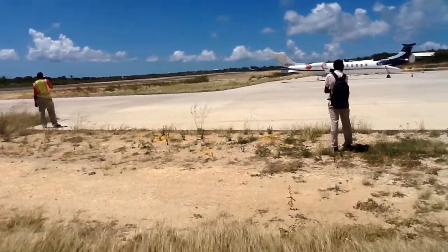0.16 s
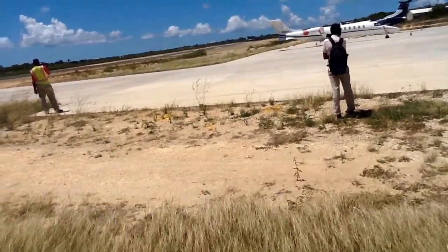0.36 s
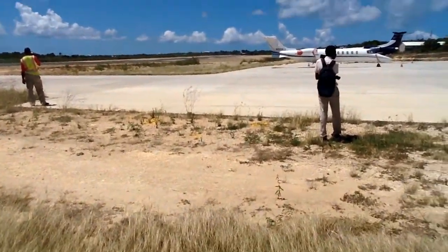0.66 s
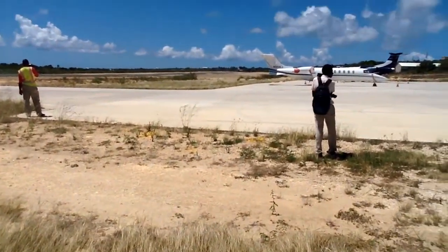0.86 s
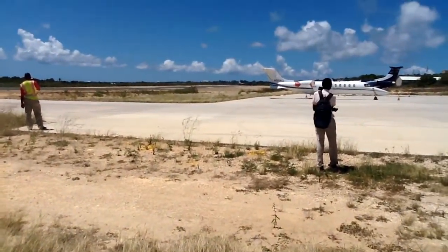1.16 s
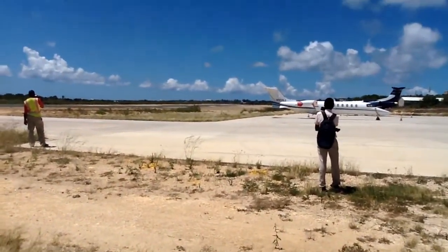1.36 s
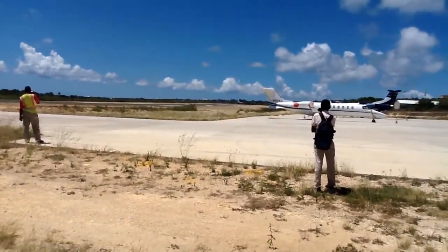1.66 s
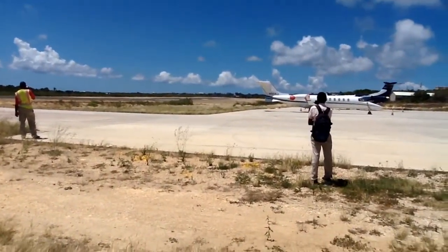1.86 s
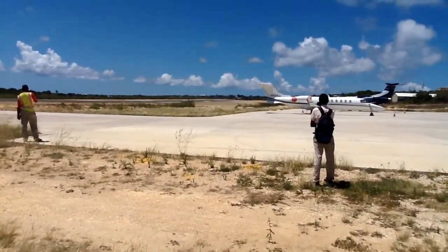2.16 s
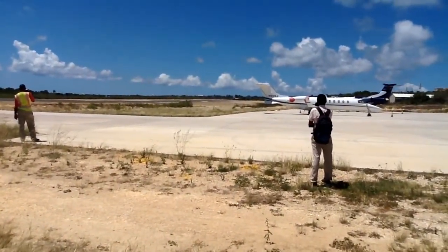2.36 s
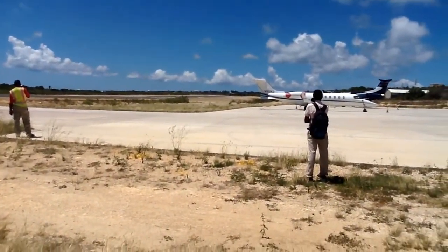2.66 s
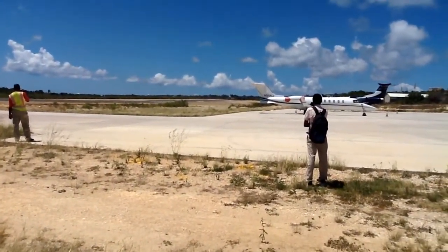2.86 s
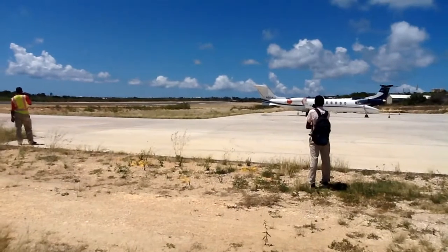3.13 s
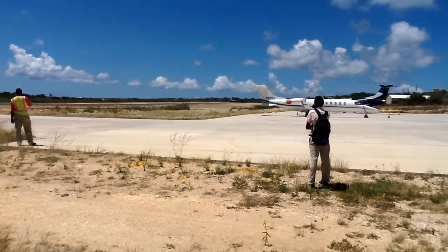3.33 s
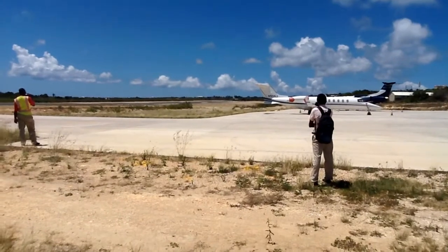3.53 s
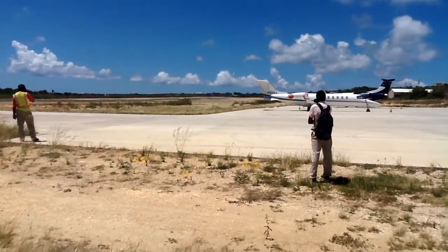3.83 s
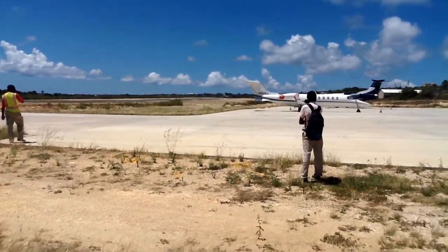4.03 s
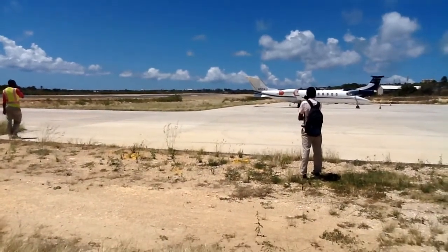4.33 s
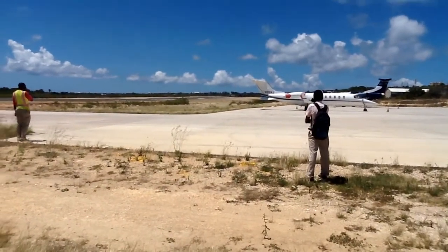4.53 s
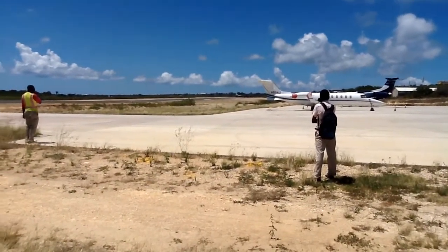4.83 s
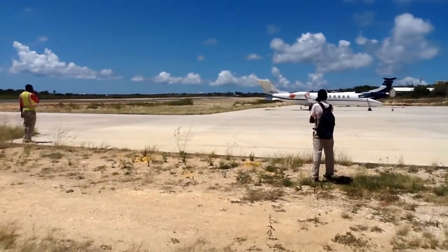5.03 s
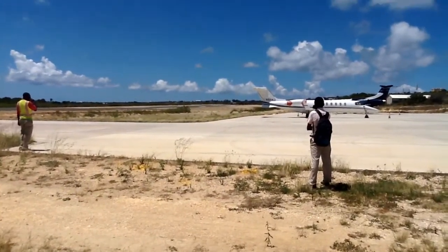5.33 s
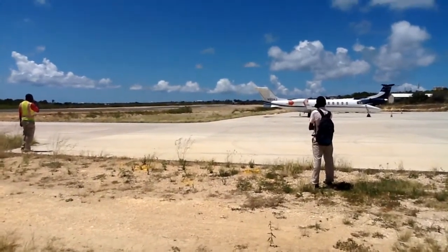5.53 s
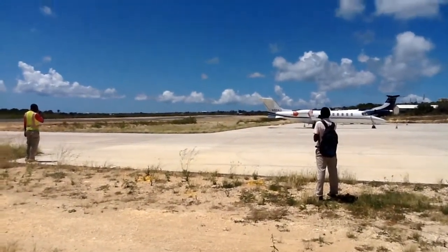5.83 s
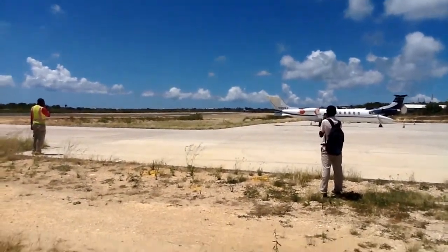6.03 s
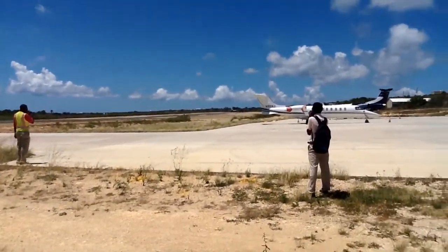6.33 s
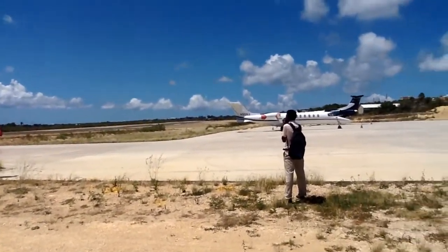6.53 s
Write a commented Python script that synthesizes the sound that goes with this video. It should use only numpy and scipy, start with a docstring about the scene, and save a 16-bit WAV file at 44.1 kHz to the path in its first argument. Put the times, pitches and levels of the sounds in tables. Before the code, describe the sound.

Close wind noise on a handheld camera at an open airfield, about 6.7 seconds. A wavering, hollow, nearly pure whistle begins at once over low rumble and airy hiss, dips in the first second with a soft finger brush near 0.6, then jumps higher and louder around 1.1. Puffs splutter near 1 second, and dull case knocks with sharp clicks land around 0.8, 1.0, 1.5 and 2.3. The whistle whoops and sags through 3.3, with another knock there, then sinks low and weak from 3.6 to 4.5. A deep lumpy squall presses around 4.2, with paired knocks. From 4.6 the whistle surges back, chirping quickly, with knocks near 5.2, 5.4, 6.1 and 6.25. It drops briefly, fingers brush faintly around 6.3 to 6.4, and it rises again at the end. Throughout, a distant small jet makes a quiet steady rush with a barely audible thin whine.

```python
"""Windy airfield with a far-off jet

Gusty wind whistles across a camera's microphone opening, higher and louder as it speeds up, and rumbles on it.
The whistle is a wavering sine with overtones; the rumble, puffs and a deep squall are shaped noise.
A small jet far off is a steady rush of noise with a faint whine.
The hand-held camera's case knocks (short rings) and clicks (pulses), and fingers brush it (tiny grains)."""
import sys
import numpy as np
from scipy import signal
from scipy.fft import rfft, irfft, next_fast_len
from scipy.io import wavfile
from scipy.ndimage import map_coordinates

SR = 44100
rng = np.random.default_rng(int(sys.argv[2]) if len(sys.argv) > 2 else 0)


def waveform_to_disk(signal):
    """Save audio, clipped to [-1, 1], as 16-bit WAV at the path in sys.argv[1]."""
    frames = np.transpose(np.atleast_2d(signal))
    scaled = np.clip(frames, -1, 1) * 32767
    samples = np.round(scaled).astype(np.int16)
    wavfile.write(sys.argv[1], SR, samples)


N = 294906  # length in samples

# All the *_COLOUR tables are spectra; only the shape counts where the sound is later scaled to a set level.
# the jet's exhaust rush: f/Hz, level/dB per Hz
JET_COLOUR = [(60, -33), (200, -4), (500, 1.5), (850, -9), (1050, 3.5), (1500, -5.5), (1850, -3.5),
              (2050, -10), (2600, -12.5), (3100, -14), (3900, -21), (4700, -26), (5500, -34), (9000, -45.5)]
# blade tones of the two engines: f/Hz, middle level/dB
ENGINE_WHINES = [(3560, -78), (3740, -78)]

# fingers sliding on the case: t/s, half length/s, level/dB
FINGER_BRUSHES = [(0.576, 0.11, -62.5), (6.281, .035, -62), (6.4, .13, -63)]
# sound of skin on the case: f/Hz, level/dB per Hz
BRUSH_COLOUR = [(1500, -26.5), (3500, 6.5), (5000, 2.5), (7500, -2.5), (12000, -5.5), (15000, -3.5)]
# sharp clicks of the case, before the level trims in clicks(): t/s, snap level/dB, bright tick level/dB
CASE_CLICKS = [(0.3208, -25.5, -63), (0.6685, -50, -50), (0.8277, -21, -68), (1.04, -15, -52.5),
               (1.4595, -23.5, -62), (1.5467, -54, -43), (1.5589, -52, -41.5), (1.7654, -12.5, -58.5),
               (2.1833, -34.5, -46.5), (2.2009, -15, -56), (2.265, -7.5, -62.5), (2.2732, -29, -44.5),
               (3.1357, -21.5, -78), (3.264, -19, -60), (3.6183, -18.5, -71.5), (4.1974, -24, -83.5),
               (4.233, -26.5, -85), (5.5092, -21.5, -59), (6.246, -25.5, -60), (6.413, -28, -73.5)]
# the snap of a click: f/Hz, level/dB
CLICK_COLOUR = [(200, -10), (900, 4), (2200, -1), (3500, -5.5), (5000, -17.5), (6500, -30.5), (9000, -30),
                (15000, -56.5)]
# the bright tick of a click: f/Hz, level/dB
TICK_COLOUR = [(1000, -31.5), (4000, -5), (7000, 0.5), (10000, 3), (15000, -0.5)]
# dull knocks on the case: t/s, peak level of the ring/dB, f/Hz the ring settles at
CASE_KNOCKS = [(0.823, -18.5, 225.3), (1.036, -8, 318), (1.459, -6, 338), (2.265, -17.5, 403),
               (2.285, -17, 313), (3.263, -10.5, 324), (4.178, -9.5, 306), (4.199, -13.5, 452),
               (5.218, -13, 262), (5.362, -21.5, 380), (6.106, -13.5, 268), (6.246, -13.5, 316)]
# the thud within a knock: f/Hz, level/dB
THUD_COLOUR = [(60, -10.5), (200, -6), (450, 1), (1000, 4.5), (1600, -12.5), (2400, -14), (4500, -40.5),
               (7000, -64)]

# deep rumble of the squall: f/Hz, level/dB per Hz
SQUALL_COLOUR = [(40, -42), (100, -12), (170, 2), (260, 1), (380, -8), (700, -26), (3000, -80)]
# puffs that hit the diaphragm head-on: t/s, level/dB, half length/s, bass relative to that level/dB
HEAD_ON_PUFFS = [(0.022, -30, 0.017, -19), (0.942, -26, 0.016, -5), (1, -27, 0.017, -5.5),
                 (1.085, -30.5, .03, -4.5), (1.169, -27, .015, -7.5), (1.731, -30.5, 0.0448, -14),
                 (2.588, -32.5, .012, -14), (3.019, -30.5, 0.03704, -10), (3.859, -35, 0.044, -11),
                 (3.983, -33, 0.018, -7), (4.077, -27, .027, -9), (4.191, -21, .014, -11),
                 (4.244, -26.5, 0.023, -9.5), (4.63, -28, .025, -15.5), (6.12, -26.5, .013, -10.5)]
# the splutter of a puff: f/Hz, level/dB per Hz
PUFF_COLOUR = [(30, -41), (80, -25), (150, 7.5), (280, 4), (500, 1.5), (850, -7.5), (1400, -18),
               (2500, -34), (4500, -45.5), (7000, -68.5), (15000, -85)]
# the bass push of a puff: f/Hz, level/dB per Hz
PUFF_BASS_COLOUR = [(25, -14.5), (50, -15), (85, -0.5), (130, 5), (250, -10.5), (600, -57)]
# wind rumble on the diaphragm: f/Hz, level/dB per Hz
BUFFET_COLOUR = [(20, -47), (40, -36), (70, -15), (110, -11.5), (170, 0), (260, -1), (400, -7.5),
                 (700, -9.5), (1200, -32), (3000, -70)]
# hiss of small eddies at the rim: f/Hz, level/dB per Hz
EDDY_COLOUR = [(200, -22.5), (500, 8.5), (800, 6.5), (1200, -4), (1600, -7.5), (2000, -17), (2800, -23),
               (4000, -34), (6000, -49), (15000, -62)]

# wind speed between gusts, given as the pitch it whistles at: t/s, f/Hz
BREEZE_SPEED = [(0.0, 397.0), (0.05, 456.0), (0.2, 469.0), (0.33, 373.0), (0.88, 385.0), (1.12, 630.0),
                (1.45, 464.0), (1.62, 458.0), (1.92, 554.0), (2.22, 670.0), (2.33, 531.0), (2.7, 555.0),
                (3.3, 472.0), (3.6, 400.0), (4.5, 347.0), (4.66, 596.0), (5.14, 631.0), (5.44, 510.0),
                (5.75, 615.0), (6.1, 617.0), (6.25, 396.0), (6.48, 480.0), (6.56, 590), (6.69, 610)]
# gusts, each one upward whoop or chirp: peak t/s, length/s, rise in f/Hz
GUSTS = [(0.4, 0.03, 55), (0.611, 0.12, 117), (0.71, 0.035, 70), (1.031, 0.045, 197), (1.157, 0.037, 173),
         (1.269, 0.057, 50), (1.516, 0.052, 118), (1.696, 0.072, 126), (1.772, 0.047, 142),
         (1.836, 0.052, 141), (2.009, 0.019, 52), (2.243, 0.033, 50), (2.388, 0.079, 59),
         (2.594, 0.033, 121), (2.993, 0.07, 101), (3.073, 0.03, 111), (3.133, 0.029, 70),
         (3.322, 0.12, 136), (4.554, 0.02, 80), (4.619, 0.062, 204), (4.791, 0.041, 154),
         (5.089, 0.061, 99), (5.136, 0.044, 77), (5.212, 0.018, 131), (5.251, 0.025, 126),
         (5.332, 0.019, 97), (5.436, 0.034, 82), (5.61, 0.098, 91), (5.687, 0.018, 87), (5.736, 0.038, 102),
         (5.858, 0.12, 111), (5.981, 0.026, 132), (6.158, 0.072, 88), (6.345, 0.047, 224),
         (6.552, 0.04, 110)]
# lulls, in which the whistle sags: deepest t/s, length/s, drop in f/Hz
LULLS = [(1.783, 0.044, 166), (2.103, 0.047, 181), (2.486, 0.039, 75), (2.862, 0.1, 106),
         (3.177, 0.025, 123), (4.852, 0.037, 156), (4.959, 0.034, 74), (5.405, 0.064, 104),
         (5.468, 0.065, 78), (5.891, 0.07, 164)]
# how well the veering wind hits the edge of the opening: t/s, effect on the tone level/dB
WIND_AIM = [(0.0, -6), (0.16, -1.5), (0.4, -6.5), (0.65, -10), (0.88, -8.5), (1.15, -16.1), (1.2, -2.5),
            (1.7, -5.5), (1.9, -4), (2.5, -5), (3.1, -9), (3.38, -3.5), (3.7, -16.5), (4.45, -15.5),
            (4.6, -5.5), (5.13, -5), (5.5, -8.5), (6.05, -5), (6.3, -12), (6.69, -5.2)]
# overtones of the whistle at the usual speed: multiple of its pitch, level relative to the tone/dB
WHISTLE_OVERTONES = [(2, -24), (3, -32), (4, -43)]
# steady hiss of the camera: f/Hz, level/dB per Hz
CAMERA_HISS_COLOUR = [(100, -4.5), (5000, -4), (8000, -4), (15000, -8)]

USUAL_HZ = 550  # the usual wind speed, as a whistle pitch


def amp(db):
    """Turn decibels into a gain."""
    return 10 ** (np.asarray(db) / 20)


def unit(x):
    """Scale a sound to an rms (average strength) of 1."""
    return x / np.sqrt(np.mean(x ** 2) + 1e-20)


def along(points, hz):
    """Read a table of (f/Hz, value) points on a log frequency axis."""
    f, value = np.transpose(points)
    return np.interp(np.log(hz + 1), np.log(f + 1), value)


def curve(rows):
    """Join (t/s, value) points with straight lines, giving one value per sample."""
    t, value = np.transpose(rows)
    return np.interp(np.arange(N) / SR, t, value)


def wobble(rate):
    """A smooth random curve with `rate` new random points a second."""
    knots = rng.standard_normal(int(N * rate / SR) + 4)
    return map_coordinates(knots, [np.arange(N) * rate / SR])


def swell(s, half):
    """A flat-topped burst of height 1 centred on time s."""
    return np.exp(-.5 * ((np.arange(N) / SR - s) / half) ** 4)


def filtered(x, response):
    """Multiply each frequency of x by the gain response(hz)."""
    m = next_fast_len(N + SR // 2)  # spare room at the end
    return irfft(rfft(x, m) * response(np.fft.rfftfreq(m, 1 / SR)), m)[:N]


def coloured(x, colour):
    """Shape x with a spectrum, at rms 1."""
    return unit(filtered(x, lambda hz: amp(along(colour, hz))))


def rush(colour):
    """Steady noise with a given spectrum, at rms 1."""
    return coloured(rng.standard_normal(N), colour)


def snap(colour, size=1024):
    """A pulse with a given spectrum and its energy as early as possible (minimum phase), at peak 1."""
    cepstrum = irfft(np.log(amp(along(colour, np.fft.rfftfreq(size, 1 / SR)))))
    # folding the second half onto the first leaves nothing before time zero
    cepstrum[1:size // 2] *= 2
    cepstrum[size // 2 + 1:] = 0
    pulse = irfft(np.exp(rfft(cepstrum)))
    return pulse / np.abs(pulse).max()


def add(track, s, sound):
    """Mix a sound into a track at time s."""
    part = track[round(s * SR):][:len(sound)]
    part += sound[:len(part)]


def engine_whine(centre_hz, half_width_hz=45):
    """A blade tone blurred by the moving air: a narrow band of noise, at rms 1."""
    def response(hz):
        return 1 / (1 + ((hz - centre_hz) / half_width_hz) ** 2)
    return unit(filtered(rng.standard_normal(N), response))


def jet(roar_db=-49):
    """Distant idling turbofans give a rush of exhaust and a thin blade whine from each engine."""
    whine = sum(amp(db + 3 * wobble(3)) * engine_whine(hz) for hz, db in ENGINE_WHINES)
    roar = amp(roar_db + 0.92 * wobble(0.37)) * rush(JET_COLOUR)
    return whine + roar


def stray_clicks(per_s=3, peak_db=-38, spread_db=3):
    """The held case gives faint clicks at random moments, about per_s a second."""
    chosen = rng.random(N) < per_s / SR
    slips = chosen * amp(peak_db + spread_db * rng.standard_normal(N))
    return signal.fftconvolve(slips, snap(CLICK_COLOUR))[:N]


def brush(grain_db=3, grains_per_s=2500):
    """Skin sliding on the case sticks and slips in tiny grains."""
    level = sum(amp(db) * swell(s, half) for s, half, db in FINGER_BRUSHES)
    chosen = rng.random(N) < grains_per_s / SR
    grains = chosen * rng.standard_normal(N) * amp(grain_db * wobble(130))
    slips = amp(2.9 * rng.exponential(size=N).clip(0, 4))  # a few slips are much larger than the rest
    return level * coloured(grains * slips, BRUSH_COLOUR)


def clicks(click_db=-1, tick_db=7, t60=0.014):
    """The plastic case slips under the grip: a snap, a short crackle and a bright tick."""
    out, t = np.zeros(N), np.arange(SR // 50) / SR
    click, tick = snap(CLICK_COLOUR), snap(TICK_COLOUR)
    for s, db, treble_db in CASE_CLICKS:
        crackle = .16 * rng.standard_normal(len(t)) * amp(-60 * t / t60)  # fades by 60 dB in t60 seconds
        slip = (t == 0) + crackle
        pulse = amp(db + click_db) * click + amp(treble_db + tick_db) * tick
        add(out, s + .0007, np.convolve(slip, pulse))
    return out


def knocks(t60=0.023, attack_s=0.00057, sag=0.44, thud_db=-7, low_cut_hz=110):
    """Each dull blow rings the case for a few cycles; the pitch starts high and quickly sags."""
    out, t = np.zeros(N), np.arange(SR // 10) / SR
    thud_pulse = snap(THUD_COLOUR)
    for s, db, hz in CASE_KNOCKS:
        sagging_hz = hz * (1 + sag * np.exp(-t / 0.0005))
        phase = 2 * np.pi * np.cumsum(sagging_hz) / SR
        ring = np.sin(phase) * amp(-60 * t / t60) * (1 - np.exp(-t / attack_s))
        burst = rng.standard_normal(len(t)) * amp(-60 * t / 0.018)
        thud = np.convolve(burst, thud_pulse)[:len(t)]
        knock = ring / np.abs(ring).max() + amp(thud_db) * thud / np.abs(thud).max()
        add(out, s + .002, amp(db) * knock)
    return signal.sosfilt(signal.butter(2, low_cut_hz, "high", fs=SR, output="sos"), out)


def squall(middle_s=4.18, half_s=.2, level_db=-32.5, lumpy_db=2):
    """Head-on wind presses on the diaphragm in one deep, lumpy rumble."""
    level = amp(level_db + lumpy_db * wobble(40)) * swell(middle_s, half_s)
    return level * rush(SQUALL_COLOUR)


def puffs(rough_db=2.0):
    """A puff is a short, spluttering burst of turbulence with a push of bass."""
    body = sum(amp(db) * swell(s, half) for s, db, half, _ in HEAD_ON_PUFFS)
    bass = sum(amp(db + bass_db) * swell(s, half) for s, db, half, bass_db in HEAD_ON_PUFFS)
    splutter = coloured(rng.standard_normal(N) * amp(rough_db * wobble(240)), PUFF_COLOUR)
    return body * splutter + bass * rush(PUFF_BASS_COLOUR)


def wind(speed_hz, buffet_db=-36, buffet_power=.7, buffet_db_per_s=0.55,
         eddy_db=-40.0, eddy_power=4, eddy_db_per_s=0.14):
    """Turbulence rumbles in lumps and hisses at the rim; both grow with wind speed and slowly build."""
    speed = speed_hz / USUAL_HZ
    from_middle = (np.arange(N) - N / 2) / SR  # seconds before or after the middle
    lumps = wobble(70)  # shared, so rumble and hiss swell together
    buffet = unit(amp(2.0 * lumps) * rush(BUFFET_COLOUR))
    buffet *= amp(buffet_db + buffet_db_per_s * from_middle)
    eddies = unit(amp(2.2 * lumps + 3.3 * wobble(260)) * rush(EDDY_COLOUR))
    eddies *= amp(eddy_db + eddy_db_per_s * from_middle)
    return speed ** buffet_power * buffet + speed ** eddy_power * eddies


def surges(rows, rising=.4):
    """Wind speed changes, in Hz of pitch, that set in fast and fade more slowly (rising = share setting in)."""
    t = np.arange(N) / SR
    total = np.zeros(N)
    for s, length, hz in rows:
        width = length * np.where(t < s, rising, 1 - rising)
        total += hz * np.exp(-((t - s) / width) ** 2)
    return total


def whistle(speed_hz, drive_db, tone_db=-14, half_tone_hz=552.4, onset_power=5.3, flutter_db=2,
            fray_db=-21, hiss_db=-28, choke_db=3, overtone_power=0.85):
    """Vortices shed at the opening make a nearly pure tone whose pitch and level follow the wind speed."""
    slowness = USUAL_HZ / speed_hz  # slow air barely keeps the tone going: it wavers and frays
    # puffs break up the regular shedding
    upset = np.minimum(sum(swell(s, 1.5 * half) for s, _, half, _ in HEAD_ON_PUFFS), 1)
    hz = speed_hz * (1 + (.014 * slowness ** 2 + .05 * upset) * wobble(130))
    phase = 2 * np.pi * np.cumsum(hz * (1 + 0.01613 * wobble(330))) / SR
    tone = np.sin(phase)

    overtones = sum(amp(db) * np.sin(k * phase + .85 * wobble(170)) for k, db in WHISTLE_OVERTONES)
    overtones = overtones / slowness ** overtone_power  # faster air sounds them more strongly
    # uneven vortices
    fray = amp(fray_db) * slowness * (wobble(200) * tone + wobble(200) * np.cos(phase))
    # each vortex breaks up, so the hiss pulses with the tone
    hiss = amp(hiss_db) * (hz / 650) ** 2 * (1 + .5 * tone) * rush(EDDY_COLOUR)

    flutter = flutter_db * slowness ** 1.5 * wobble(55)
    level_db = tone_db + curve(WIND_AIM) + drive_db + flutter - choke_db * upset
    # the tone grows as a power of the speed, reaches half strength at half_tone_hz, then levels off
    onset = 1 / (1 + (half_tone_hz / speed_hz) ** onset_power)
    return np.sqrt(2) * amp(level_db) * onset * (tone + overtones + fray + hiss)


def scene(flurry_share=.024, flurries_per_s=95, flurry_db=1.22, gust_db_per_hz=0.0091):
    """Breeze, gusts, lulls and random flurries add up to one wind speed for whistle, rumble and hiss."""
    gust_hz, lull_hz, flurry = surges(GUSTS), surges(LULLS), wobble(flurries_per_s)
    speed_hz = (curve(BREEZE_SPEED) + gust_hz - lull_hz) * (1 + flurry_share * flurry)
    drive_db = gust_db_per_hz * gust_hz + flurry_db * flurry  # a gust drives the tone harder
    handling = stray_clicks() + brush() + clicks() + knocks()
    air = squall() + puffs() + wind(speed_hz) + whistle(speed_hz, drive_db)
    return (jet() + handling + air)[None]


def record(dry, hiss_db=-66.0, low_cut_hz=55, top_hz=15400):
    """The camera cuts the deep bass, adds its own hiss and keeps nothing above its band limit."""
    cut = signal.sosfilt(signal.butter(2, low_cut_hz, "high", fs=SR, output="sos"), dry[0])
    hissing = cut + amp(hiss_db) * rush(CAMERA_HISS_COLOUR)
    return filtered(hissing, lambda hz: hz < top_hz)[None]


dry = scene()
out = record(dry)
waveform_to_disk(out)
```